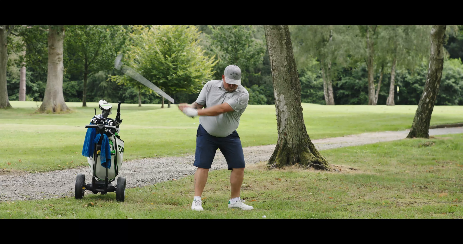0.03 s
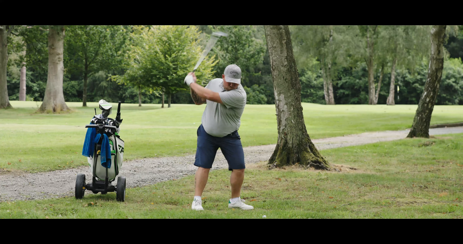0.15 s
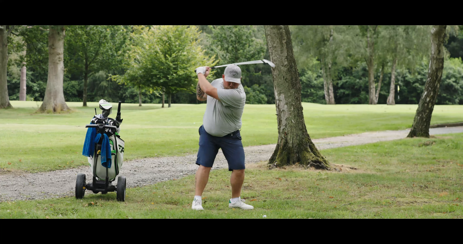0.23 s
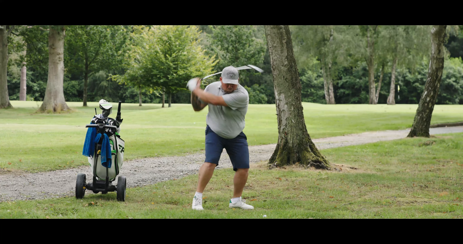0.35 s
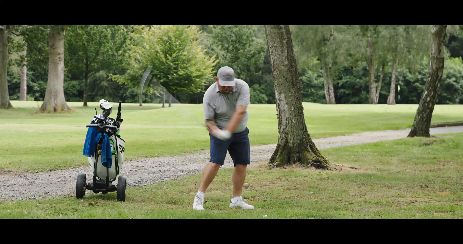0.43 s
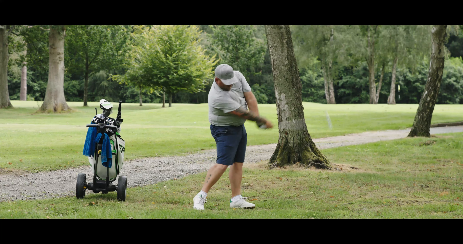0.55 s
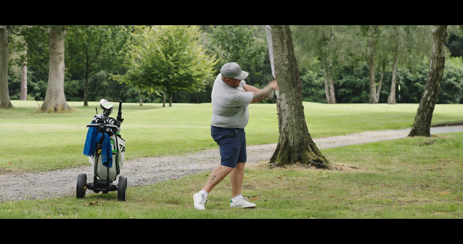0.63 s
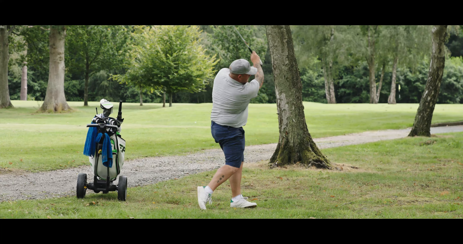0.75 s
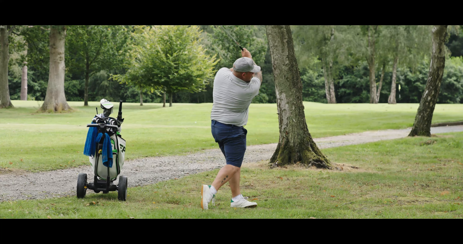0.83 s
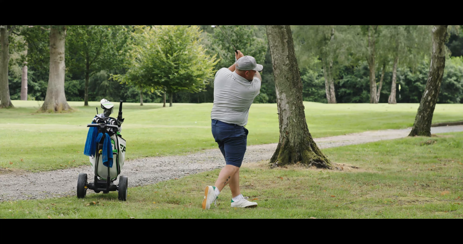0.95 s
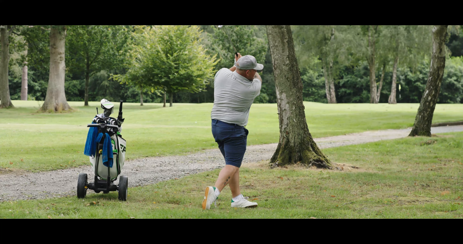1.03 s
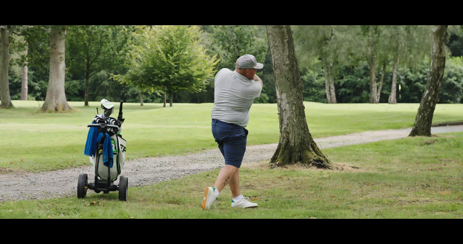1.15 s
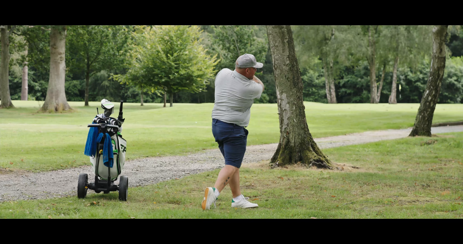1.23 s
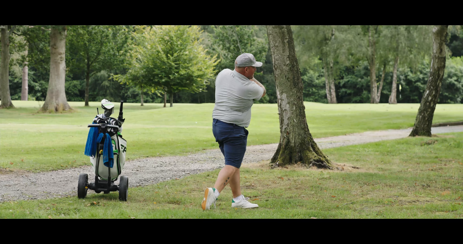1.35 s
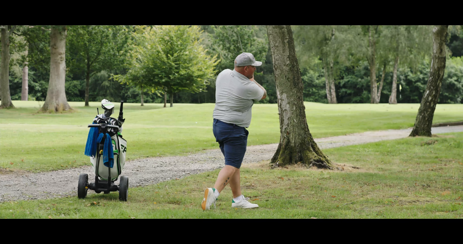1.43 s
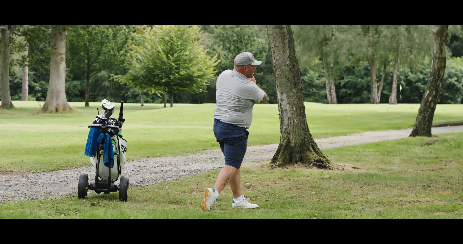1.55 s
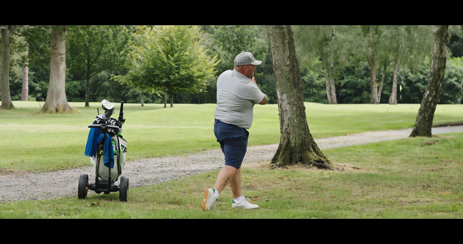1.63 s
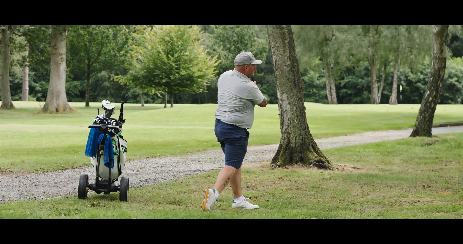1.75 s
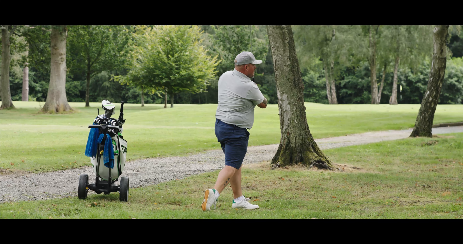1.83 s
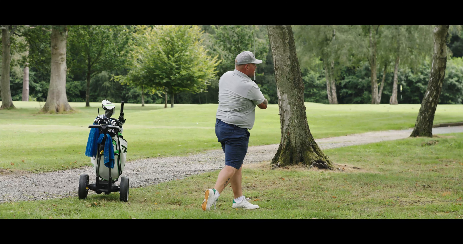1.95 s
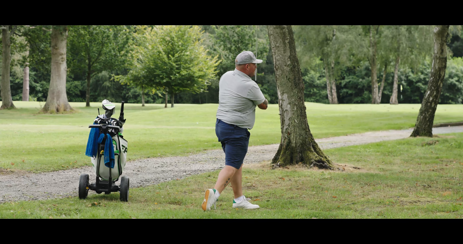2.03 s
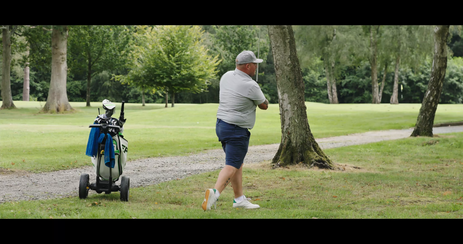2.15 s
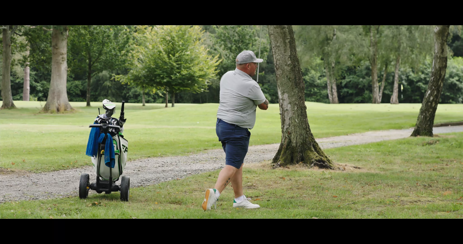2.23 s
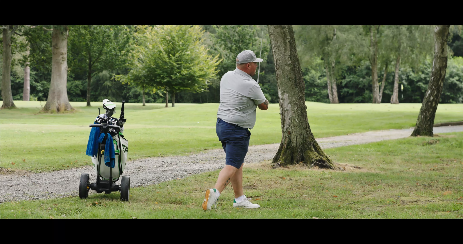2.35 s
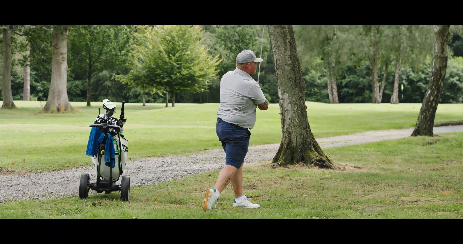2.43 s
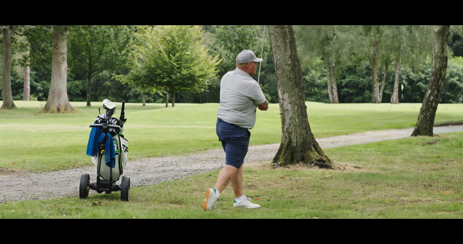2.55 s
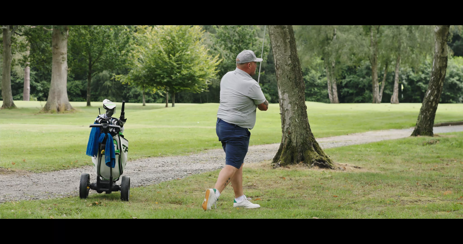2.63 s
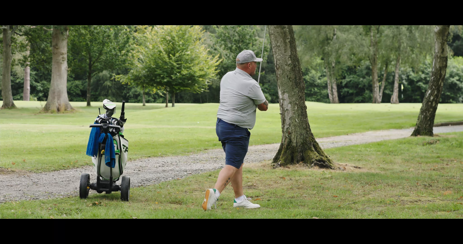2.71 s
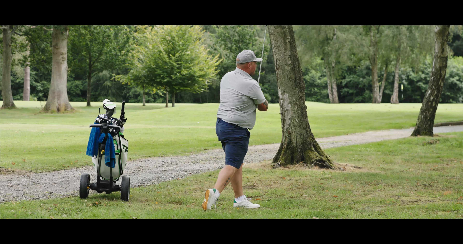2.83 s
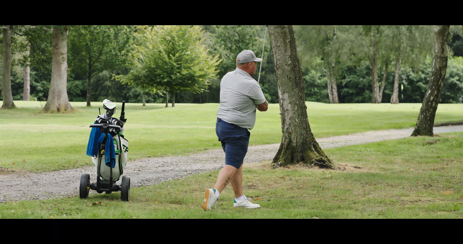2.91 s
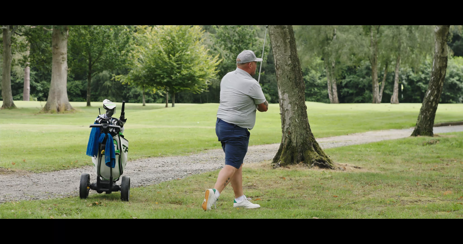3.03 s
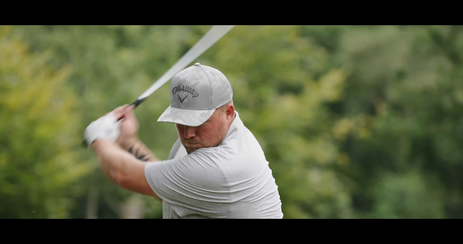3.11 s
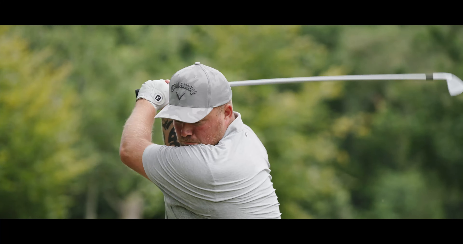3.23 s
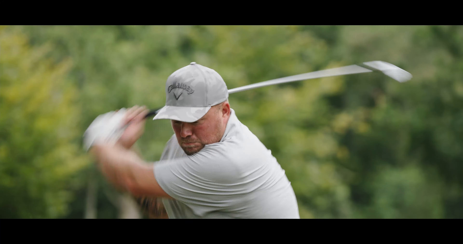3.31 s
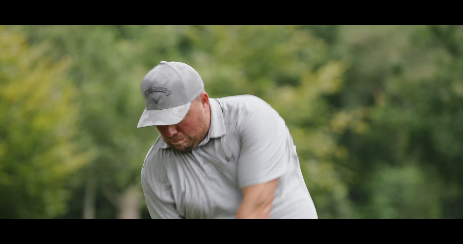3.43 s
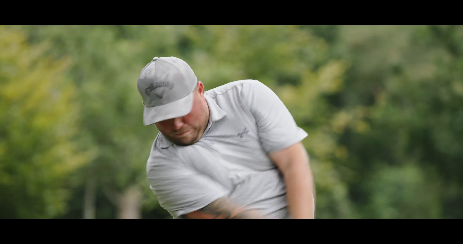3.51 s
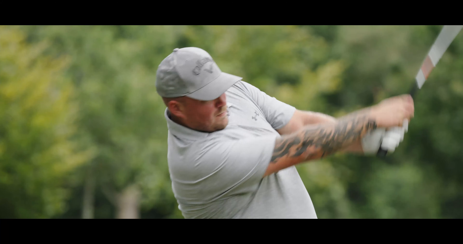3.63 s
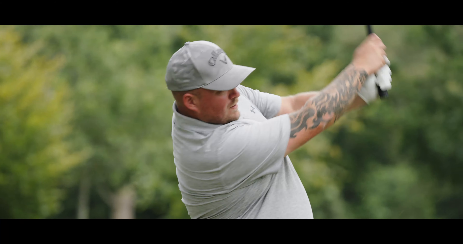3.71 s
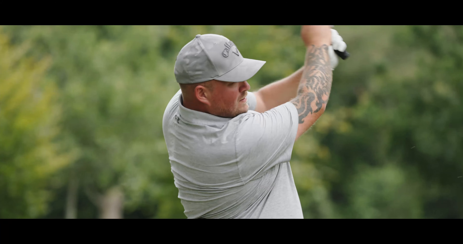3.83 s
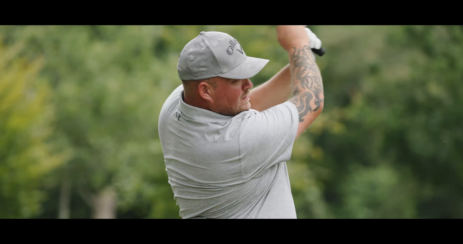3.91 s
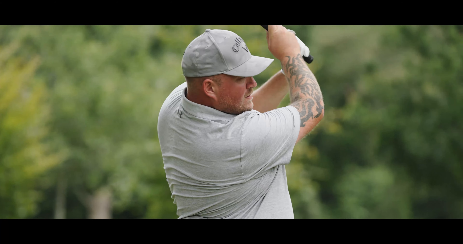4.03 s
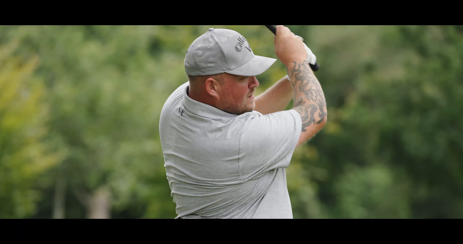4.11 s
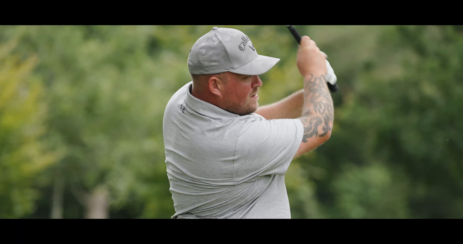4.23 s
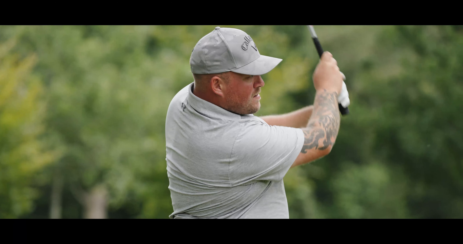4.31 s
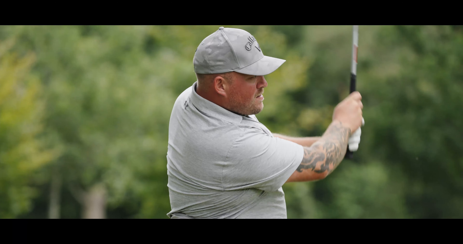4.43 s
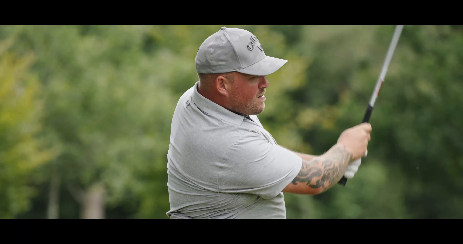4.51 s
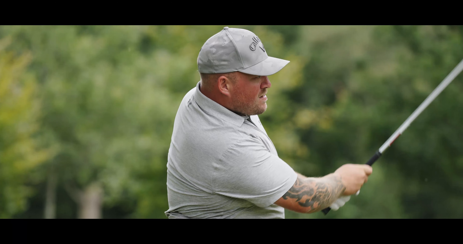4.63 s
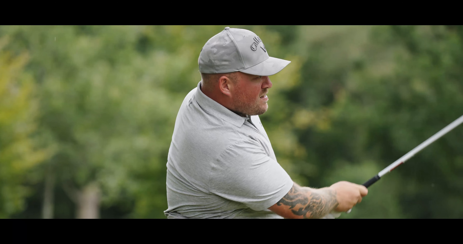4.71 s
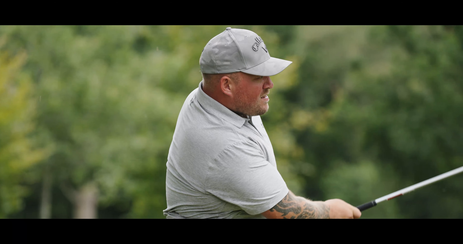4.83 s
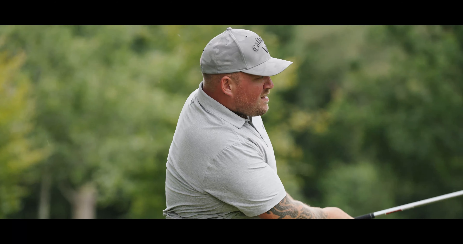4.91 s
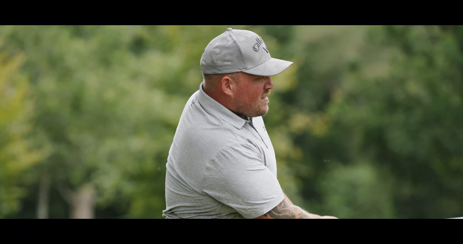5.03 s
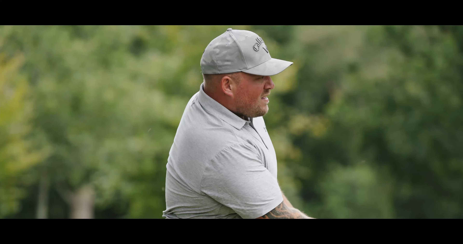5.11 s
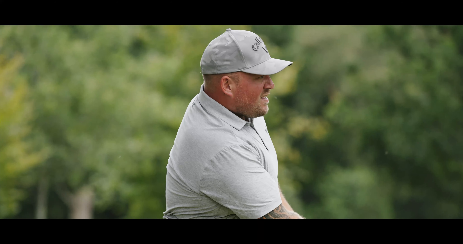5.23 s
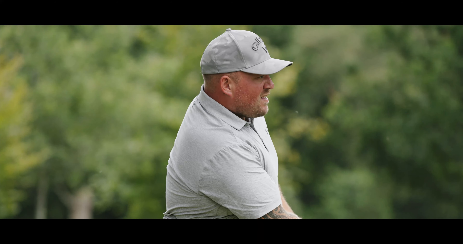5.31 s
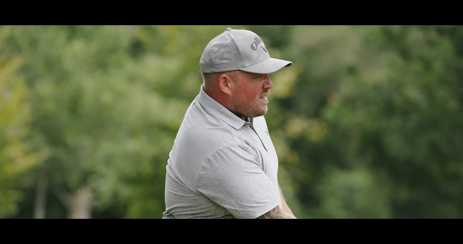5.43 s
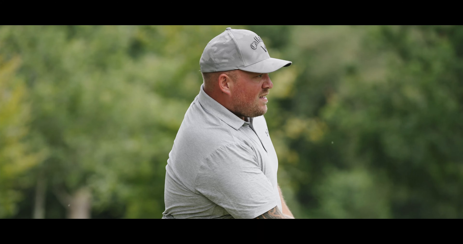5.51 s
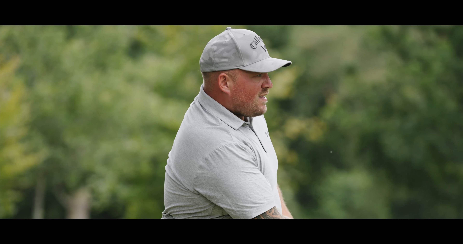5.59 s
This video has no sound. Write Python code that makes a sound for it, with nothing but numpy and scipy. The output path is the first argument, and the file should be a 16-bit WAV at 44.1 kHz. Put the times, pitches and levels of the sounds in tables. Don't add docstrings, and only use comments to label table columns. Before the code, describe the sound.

A club whips and cracks a ball that knocks two trunks; a second shot follows, ending in a fainter, distant wooden knock.

```python
import sys
import numpy as np
from scipy import signal
from scipy.fft import rfft, irfft
from scipy.io import wavfile
from scipy.ndimage import uniform_filter1d

SR = 44100
rng = np.random.default_rng(int(sys.argv[2]) if len(sys.argv) > 2 else 0)


def dump_mix(stems):
    frames = np.atleast_2d(stems).T
    limited = np.clip(frames, -1, 1)
    pcm = np.round(limited * 32767).astype(np.int16)
    wavfile.write(sys.argv[1], SR, pcm)


def attenuation_scalar(level_db):
    decades = np.asarray(level_db, float) / 20
    return 10 ** decades


N = 249606


def evened(x):
    return x / np.sqrt(np.mean(x ** 2) + 1e-20)


def read(points, hz):
    f, value = np.transpose(points)
    return np.interp(np.log(hz + 1), np.log(f + 1), value)


def add(mix, start_s, sound):
    part = mix[round(start_s * SR):][:len(sound)]
    part += sound[:len(part)]


def laid(maker, rows):
    track = np.zeros(N)
    for row in rows:
        add(track, *maker(*row))
    return track


def resonate(x, hz, width_hz):
    turn = np.exp(2j * np.pi * np.cumsum(hz * np.ones(len(x))) / SR)
    r = np.exp(-np.pi * width_hz / SR)
    return 2 * (turn * signal.lfilter([1 - r], [1, -r], x / turn + 1e-18)).real


def ring(x, modes):
    y = np.zeros(len(x))
    for k, (hz, width_hz, db) in enumerate(modes):
        y += (-1) ** k * attenuation_scalar(db) * resonate(x, hz, width_hz) / width_hz
    return y / abs(y).max()


def coloured(x, points):
    gain = attenuation_scalar(read(points, np.fft.rfftfreq(len(x), 1 / SR)))
    return evened(irfft(rfft(x) * gain, len(x)))


# (frequency [Hz], width [Hz], level [dB])
HEAD_MODES = [(2420, 310, -28.5), (4000, 2000, -41), (5290, 360, 11), (6470, 1700, 24.5)]
# (time [s], peak [dB], pulse [ms])
BALL_CRACKS = [(.5744, 0, .44), (.58, -13, .3), (.5975, -24, .2), (.6215, -19, .6), (.633, -25, .32),
               (.642, -24, .32), (3.531, -.8, .5), (3.5364, -7, .36), (3.5438, -20, .2), (3.5546, -9, .22),
               (3.5875, -20, .2), (3.603, -24, .34), (3.6985, -30, .2)]


def crack(start_s, peak_db, pulse_ms):
    u = np.arange(600) / SR / (pulse_ms / 1000)
    pulse = np.where(u < 1, np.sin(2 * np.pi * u) * (0.84 + 0.65 * u), 0)
    scrape = rng.standard_normal(600) * np.exp(-u / 1.5)
    db_per_octave, even_pulse_ms = -4.5, 0.36
    ring_db = db_per_octave * np.log2(pulse_ms / even_pulse_ms)
    return start_s, attenuation_scalar(peak_db) * (pulse + attenuation_scalar(ring_db) * ring(pulse + .45 * scrape, HEAD_MODES))


# (time [s], peak [dB])
FIRST_TOUCHES = [
    (0.5742, -15),
    (3.5313, -15),
]


def tick(start_s, peak_db, *_):
    return start_s, attenuation_scalar(peak_db) * np.array([1., .6])


# (time [s], length [s], level [dB], start [Hz], end [Hz])
FACE_SQUEEZES = [
    (.5758, .0052, -12.5, 950, 2700),
    (3.5316, .004, -16, 2800, 4000),
]


def squeeze(start_s, length_s, db, start_hz, end_hz):
    u = np.linspace(0, 1, round(length_s * SR))
    hz = start_hz + (end_hz - start_hz) * u ** 2.23
    tone = np.sin(2 * np.pi * np.cumsum(hz) / SR)
    return start_s, attenuation_scalar(db) * tone * signal.windows.tukey(len(u), .4)


# (impact [s], audible length [s], level at impact [dB], shaft whistle at impact [Hz])
DOWNSWINGS = [
    (0.575, .095, -33.5, 700),
    (3.531, .091, -35, 790),
]


def swish(impact_s, length_s, top_db, top_hz):
    u = np.arange(0, length_s, 1 / SR) / length_s
    first_heard_db, swell_power, slow_pitch = -40, 3.03, 0.71
    level_db = top_db + first_heard_db * (1 - u) ** swell_power
    hz = top_hz * (slow_pitch + (1 - slow_pitch) * u)
    wake_hz = np.interp(u, [0, 1], [855, 1740])
    wake_db = np.interp(u, [0, 0.63, 1], [-9, 2, -9])
    a, b, c = rng.standard_normal((len(u), 3)).T
    whistle = evened(resonate(resonate(a, hz, 260), hz, 260))
    wake = evened(resonate(resonate(b, wake_hz, 1700), wake_hz, 1700))
    wake += attenuation_scalar(-13.5) * evened(resonate(resonate(c, 6700, 1800), 6500, 1800))
    fade = np.minimum(12 * u, 1) * np.minimum(50 * (1 - u), 1)
    return impact_s - length_s, attenuation_scalar(level_db) * (whistle + attenuation_scalar(wake_db) * wake) * fade


# (frequency [Hz], level [dB])
GRIT_SPECTRUM = [(2500, -24), (3500, -15), (4300, -1.5), (5200, -6.5), (6600, 5.5), (7600, -9.5),
                 (8600, -18), (10500, -35), (13000, -51), (13800, -72)]
# (frequency [Hz], level [dB])
CLOD_SPECTRUM = [(100, -57), (300, 2.5), (600, -6), (1100, 4.5), (1600, 1.5), (2300, 3), (3100, 5.5),
                 (3700, 6.5), (5000, -51)]
# (time [s], first burst [dB], cloud [dB], clods against grit [dB], fine sand [dB/octave])
DIVOTS = [
    (0.5753, -19.5, -23, -7.5, -2),
    (3.532, -14, -24, -12.5, 18),
]


def spray(start_s, burst_db, cloud_db, clods_db, sand_db):
    length_s, rise_s = .46, 0.021
    sand_hz, sand_top_db, burst_clods_db = 6600, 2.5, 10.5
    t = np.arange(0, length_s, 1 / SR)
    draw, size, sign = rng.random((len(t), 3)).T
    grains = np.sign(sign - .5) * attenuation_scalar(-2.2 * np.log(size + 0.11))
    sandy = [(hz, db + min(sand_db * max(np.log2(hz / sand_hz), 0), sand_top_db))
             for hz, db in GRIT_SPECTRUM]
    grit = coloured(grains * (draw < 9000 / SR), sandy)
    clods = coloured(grains * (draw > 1 - 2000 / SR), CLOD_SPECTRUM)
    burst = attenuation_scalar(burst_db - 1100 * t)
    dropping = attenuation_scalar(-190 * np.maximum(t - 2 * rise_s, 0))
    drifting = attenuation_scalar(-10.5 - 54 * t)
    cloud = attenuation_scalar(cloud_db) * (1 - np.exp(-(t / rise_s) ** 2)) * (dropping + drifting)
    fade = np.minimum(t * 1000, 1) * np.minimum((length_s - t) * 10, 1)
    clod_level = attenuation_scalar(clods_db) * (attenuation_scalar(burst_clods_db) * burst + cloud)
    return start_s, fade * ((burst + cloud) * grit + clod_level * clods)


# (frequency [Hz], width [Hz], level [dB])
TRUNK_MODES = [
    [(434, 110, -14), (790, 135, -7.5), (1060, 190, 3.5), (1440, 60, 0.5), (2010, 240, 2), (2534, 100, -2),
     (3500, 170, -7), (4370, 1800, -3), (5600, 600, -48), (6400, 230, -7.5)],
    [(800, 400, -1), (1050, 350, -3), (1312, 60, -3), (1940, 170, -4), (2170, 250, -5), (3800, 400, -12),
     (4600, 600, -8), (5800, 500, -17), (6900, 500, -14)],
    [(620, 93, -8.5), (920, 190, 1.5), (1180, 65, -2), (1776, 180, 4), (2055, 300, 5.5), (2950, 380, -18),
     (3700, 410, -27), (4600, 390, -2.5), (7100, 190, -2)],
]
# (time [s], peak [dB], trunk [index], contact [ms], top [Hz])
TRUNK_KNOCKS = [
    (1.0768, -5, 0, 1.65, 9000),
    (1.1911, -6, 1, 0.3, 6000),
    (4.697, -15.5, 2, 0.15, 3500),
]


def knock(start_s, peak_db, trunk, contact_ms, top_hz):
    u = np.arange(3000) / SR / (contact_ms / 1000)
    contact = (u == 0) + 0.36 * rng.standard_normal(3000) * np.exp(-u)
    dulled = signal.lfilter(*signal.butter(2, top_hz, fs=SR), contact)
    return start_s, attenuation_scalar(peak_db) * ring(dulled, TRUNK_MODES[round(trunk)])


# (frequency [Hz], level [dB])
BARK_SPECTRUM = [(200, -21), (500, -17), (1000, -8.5), (1200, -4.5), (1330, 4), (1500, -3), (1750, -4.5),
                 (2050, -6.5), (2700, -17), (3700, -14), (5000, -21), (6800, -18), (8000, -27.5),
                 (11000, -46)]


def chips(start_s, peak_db, *_):
    level_db, decay_ms, tilt_db_per_octave = -16.5, 10.4, 2.5
    t = np.arange(3000) / SR
    size, sign = rng.random((3000, 2)).T
    tilted = [(hz, db + tilt_db_per_octave * np.log2(hz / 1000)) for hz, db in BARK_SPECTRUM]
    crumbs = coloured(np.sign(sign - .5) * np.log(size + .01) ** 2, tilted)
    envelope = np.minimum(t * 1000, 1) * np.exp(-t * 1000 / decay_ms)
    return start_s, attenuation_scalar(peak_db + level_db) * crumbs * envelope


# (time [s], peak
# [dB], trunk that was hit [index])
TRUNK_ECHOES = [(1.0858, -15.5, 0), (1.103, -11.5, 0), (1.1124, -16, 0), (1.12, -23, 0), (1.127, -29.5, 0),
                (1.1515, -28, 0), (1.1945, -15, 1), (1.198, -18.5, 1), (1.2295, -29, 1), (1.2346, -20.5, 1),
                (1.258, -27.5, 1), (4.698, -22, 2), (4.7017, -25, 2), (4.7274, -27, 2), (4.7354, -23, 2),
                (4.749, -29.5, 2), (4.771, -33, 2), (4.778, -29.5, 2), (4.79, -32, 2)]


def echo(start_s, peak_db, trunk):
    k = round(trunk)
    top_hz = (3000, 3000, 4200)[k]
    smear_ms = (2.4, 1.4, .3)[k] + 20 * (start_s - TRUNK_KNOCKS[k][0])
    return knock(start_s, peak_db, k, smear_ms, top_hz)


def scatter(decays, build_s, uneven_db):
    taps = np.zeros(2 * SR)
    at = np.arange(0, 2 * SR - 20, 20) + rng.integers(0, 20, (2 * SR - 1) // 20)
    tap_db = uneven_db * np.minimum(rng.exponential(1, len(at)), 4)
    taps[at] = rng.choice([-1., 1.], len(at)) * attenuation_scalar(tap_db)
    hz, t, z = signal.stft(taps, SR, nperseg=256)
    decay = attenuation_scalar(-60 * t / read(decays, hz)[:, None])
    tail = signal.istft(z * decay, SR, nperseg=256)[1]
    tail = tail * (1 - np.exp(-(np.arange(len(tail)) / SR / build_s) ** 2))
    return tail / np.linalg.norm(tail)


# (frequency [Hz], t60 [s])
NEAR_DECAYS = [(300, 0.5), (800, 0.47), (1300, 0.57), (2100, 0.94), (5500, 0.92), (9000, 1)]
# (frequency [Hz], t60 [s])
FAR_DECAYS = [(600, .7), (1100, 1.7), (1330, 1.7), (1600, 0.96), (2100, 1.73), (4000, 1.87)]


def wood_echoes(club, wood):
    sideways = coloured(laid(tick, TRUNK_KNOCKS + TRUNK_ECHOES), BARK_SPECTRUM) * np.std(wood)
    near = scatter(NEAR_DECAYS, build_s=.016, uneven_db=3.5)
    far = scatter(FAR_DECAYS, build_s=0.073, uneven_db=0.0)
    to_near = attenuation_scalar(-11.5) * club + attenuation_scalar(-5.5) * sideways + attenuation_scalar(-16.5) * wood
    to_far = attenuation_scalar(-27.0) * club + attenuation_scalar(-16.5) * sideways + attenuation_scalar(-17) * wood
    return (signal.fftconvolve(to_near, near) + signal.fftconvolve(to_far, far))[:N]


# (time [s], peak [dB], frequency [Hz], length [s])
SOFT_THUDS = [(0.511, -43, 90, 0.024), (0.585, -33.5, 111, 0.012), (.795, -35, 150, 0.012),
              (0.806, -38.5, 92, 0.021), (1.076, -32.5, 240, 0.019), (1.825, -46, 69, 0.023),
              (2.234, -35.5, 296, 0.0066), (2.397, -52.5, 60, 0.037), (3.532, -35, 384, 0.017),
              (3.546, -32.5, 392, 0.021), (4.897, -41, 503, 0.077), (5.433, -47.5, 807, 0.053)]


def thud(start_s, peak_db, hz, length_s):
    t = np.arange(round(length_s * SR)) / SR
    tone = np.sin(2 * np.pi * hz * t * (1 - 0.042 * t / length_s))
    return start_s, attenuation_scalar(peak_db) * tone * np.sin(np.pi * t / length_s)


# (frequency [Hz], level [dB per Hz])
WIDE_SPECTRUM = [(15, -37.5), (30, -14.5), (60, -12.5), (110, -7), (160, -9), (600, -5), (1200, -8),
                 (2200, -13), (5000, -22), (6300, -19), (7100, -18), (8200, -36), (10500, -49),
                 (15000, -76)]
# (frequency [Hz], level [dB per Hz])
CLOSE_SPECTRUM = [(15, -60), (30, -45), (79, -13), (163, -2.5), (400, -4.5), (952, -2.5), (1460, -6),
                  (3700, -13.5), (5100, -15), (6300, -10.5), (7200, -10), (8300, -26.5), (10500, -42),
                  (15000, -66)]
# (frequency [Hz], factor [1])
SWELL_SHARE = [(500, 0.013), (1000, 0.086), (1300, 0.47), (1550, 0.81), (1850, 0.24), (2400, 0.064),
               (5000, 0)]
# (centre [s], half length [s], swell [dB])
MIDBAND_SWELLS = [
    (1.85, 0.39, 7.5),
    (4.2, 0.28, 1.5),
    (5.024, 0.23, 10.5),
    (5.7, 0.23, 2),
]


def air():
    cut_s, wide_db, close_db = 3.14, -47.5, -45
    calm_db, wide_fade_db_per_s = -1.7, -0.44
    frames, hz = N // 256 + 5, np.fft.rfftfreq(1024, 1 / SR)
    a, b, patches = rng.standard_normal((frames, 513, 3)).T
    patches = uniform_filter1d(uniform_filter1d(patches, size=10, axis=0), size=12, axis=1)
    t = np.arange(frames) * 256 / SR
    swell_db = calm_db + sum(db * np.exp(-((t - s) / half) ** 2) for s, half, db in MIDBAND_SWELLS)
    wide = attenuation_scalar(wide_db) * evened(attenuation_scalar(read(WIDE_SPECTRUM, hz)))[:, None]
    close = attenuation_scalar(close_db) * evened(attenuation_scalar(read(CLOSE_SPECTRUM, hz)))[:, None]
    moving_db = read(SWELL_SHARE, hz)[:, None] * swell_db + 0.47 * evened(patches)
    noise = a + 1j * b
    z = noise * np.where(t < cut_s, wide * attenuation_scalar(wide_fade_db_per_s * t), close)
    unit = np.std(signal.istft(noise, nperseg=1024, noverlap=768)[1])
    return signal.istft(z * attenuation_scalar(moving_db), nperseg=1024, noverlap=768)[1][:N] / unit


def scene():
    club = laid(crack, BALL_CRACKS) + laid(squeeze, FACE_SQUEEZES) + laid(swish, DOWNSWINGS)
    wood = laid(knock, TRUNK_KNOCKS) + laid(echo, TRUNK_ECHOES)
    struck = club + wood + laid(chips, TRUNK_KNOCKS + TRUNK_ECHOES) + wood_echoes(club, wood)
    cloth = signal.butter(5, 7330, fs=SR, output="sos")
    small_bodies = signal.butter(2, 160, "high", fs=SR, output="sos")
    struck = signal.sosfilt(small_bodies, signal.sosfilt(cloth, struck))
    direct = laid(tick, FIRST_TOUCHES) + laid(spray, DIVOTS) + laid(thud, SOFT_THUDS)
    return (struck + direct + air())[None]


TOP_DIPS = [.082, .103, .253, .359, .423, .466, 1.362, 2.023, 2.087, 2.193, 2.279, 2.343, 2.407,
            2.428, 2.62, 2.748, 4.775]


def dip_top(x):
    size, out = 1882, x.copy()
    hz = np.fft.rfftfreq(size, 1 / SR)
    window = np.sqrt(np.hanning(size))
    for centre_s, draw in zip(TOP_DIPS, rng.random((len(TOP_DIPS), 80))):
        band = draw[np.minimum(hz // 300, 79).astype(int)]
        lost = (hz > 7500) | ((hz > 2800) & (hz < 6000) & (band < .3))
        frame = x[round(centre_s * SR) - size // 2:][:size]
        missing = window * irfft(rfft(frame * window) * lost, size)
        add(out, centre_s - size / 2 / SR, -missing)
    return out


def roll_off(x):
    return signal.sosfilt(signal.butter(12, 16650, fs=SR, output="sos"), x)


def record(dry):
    clipped = np.clip(dry[0], -1, .85)
    mix = dip_top(clipped)[None]
    return roll_off(mix)


dry = scene()
out = record(dry)
dump_mix(out)
```